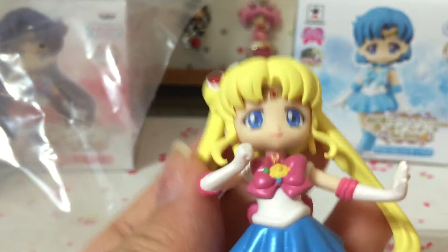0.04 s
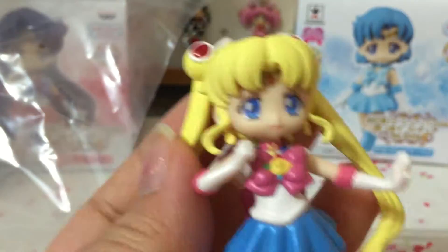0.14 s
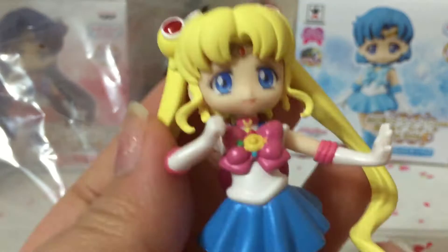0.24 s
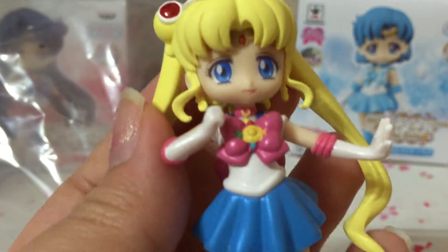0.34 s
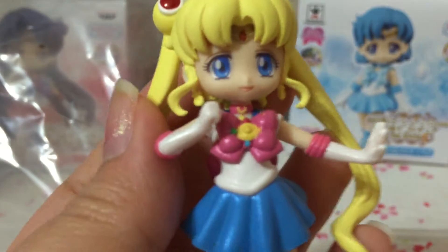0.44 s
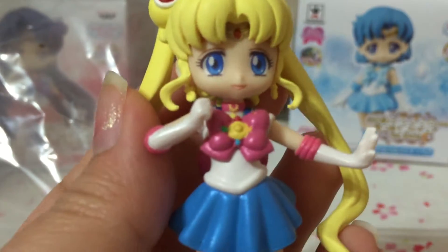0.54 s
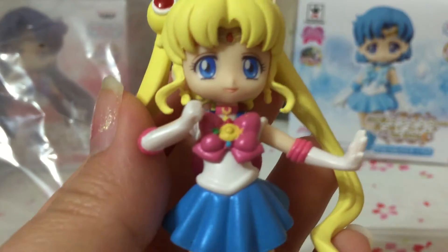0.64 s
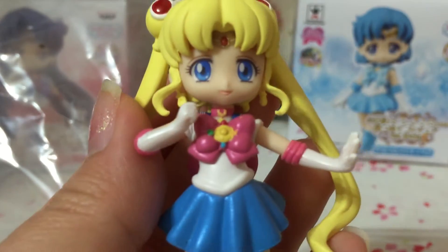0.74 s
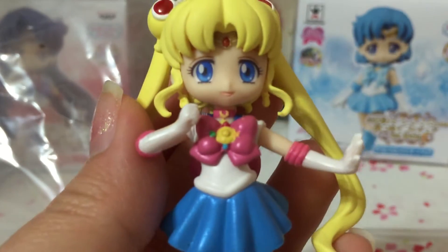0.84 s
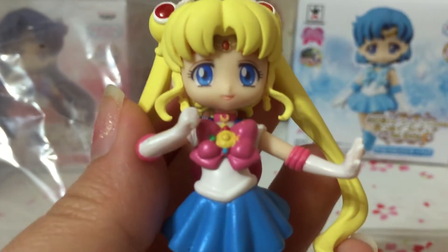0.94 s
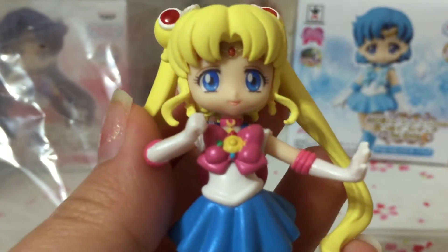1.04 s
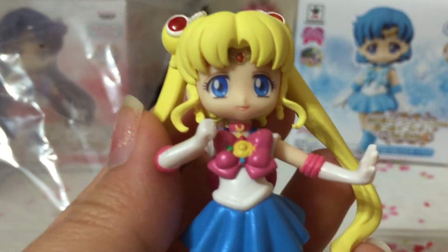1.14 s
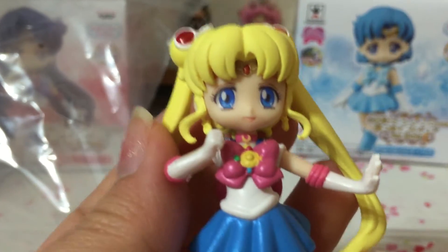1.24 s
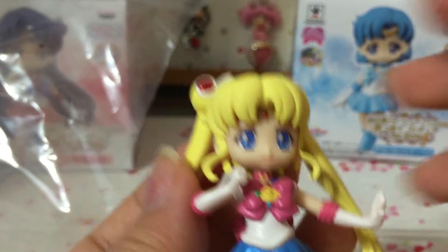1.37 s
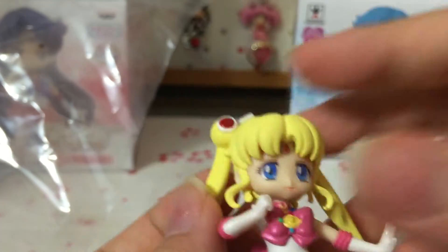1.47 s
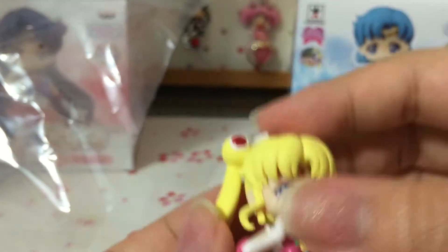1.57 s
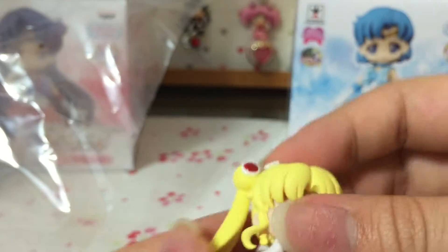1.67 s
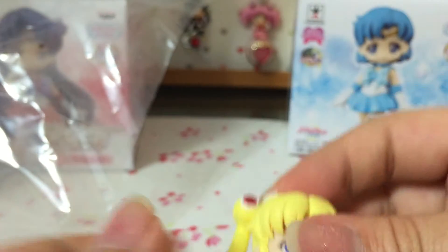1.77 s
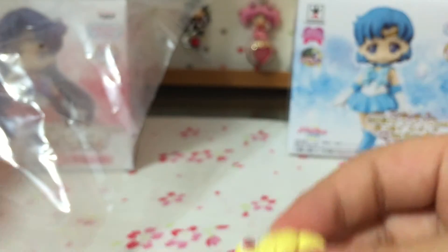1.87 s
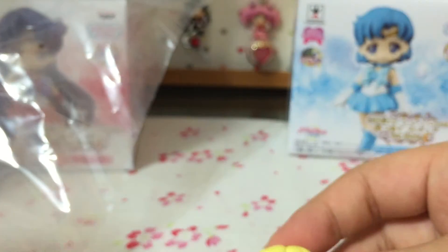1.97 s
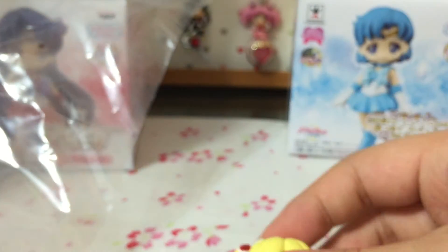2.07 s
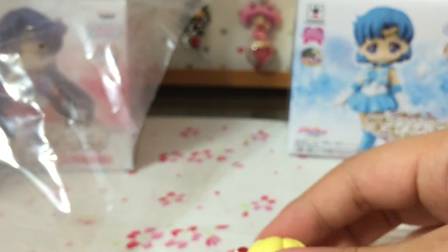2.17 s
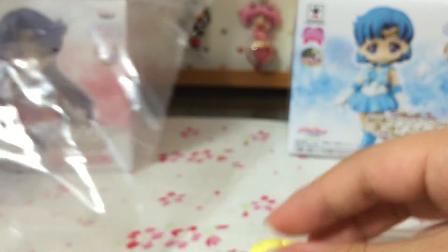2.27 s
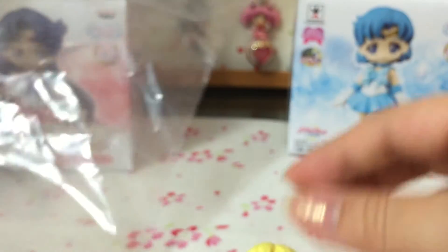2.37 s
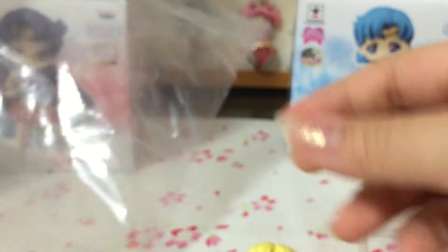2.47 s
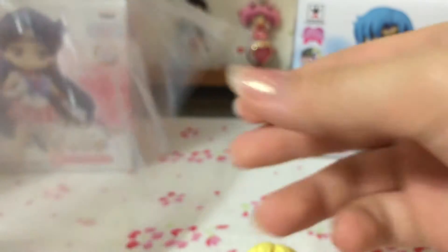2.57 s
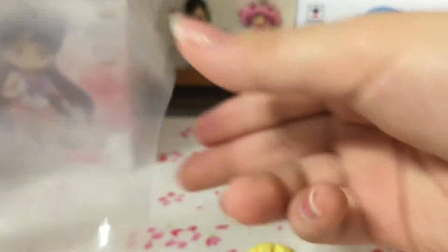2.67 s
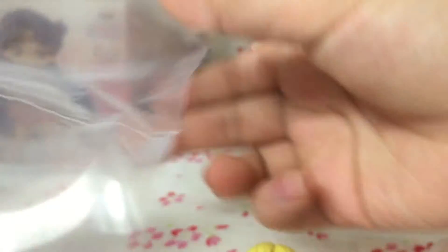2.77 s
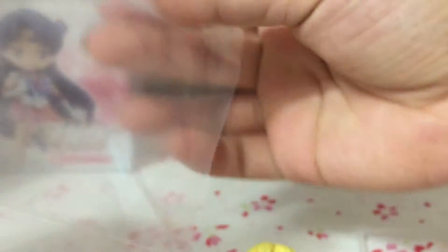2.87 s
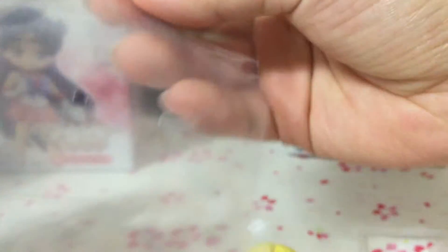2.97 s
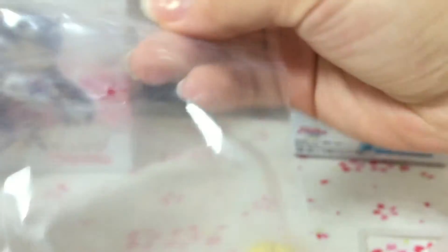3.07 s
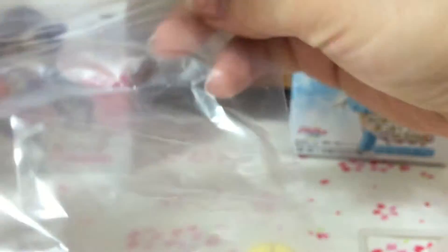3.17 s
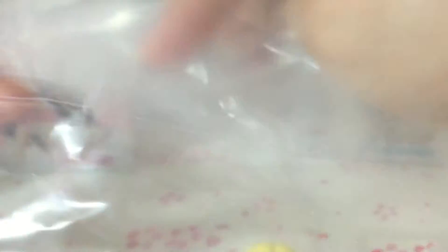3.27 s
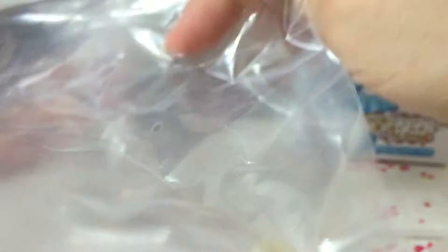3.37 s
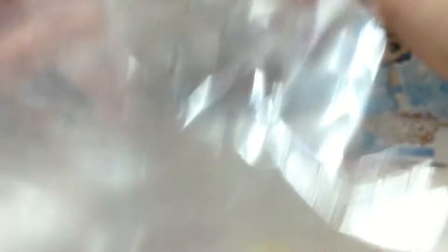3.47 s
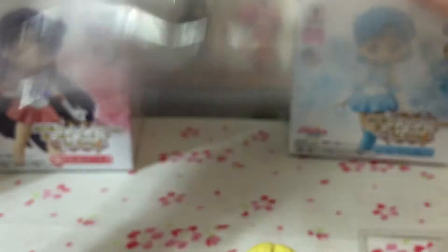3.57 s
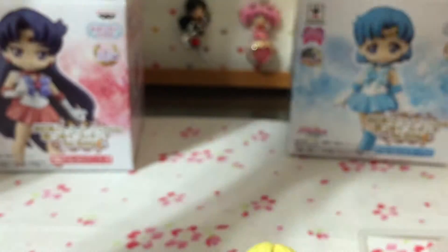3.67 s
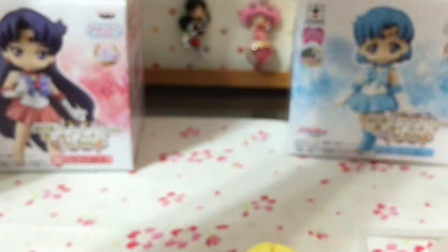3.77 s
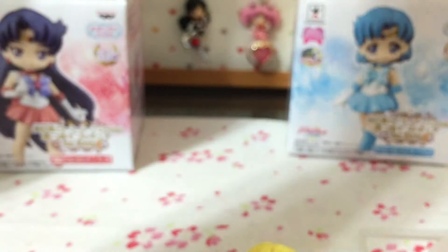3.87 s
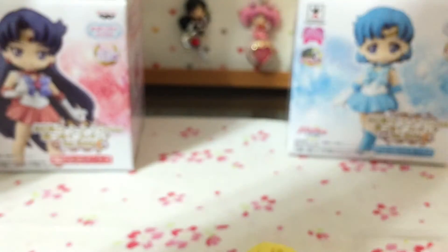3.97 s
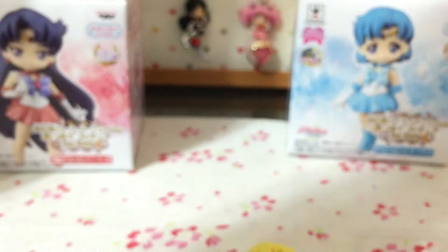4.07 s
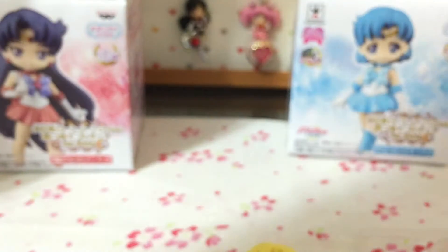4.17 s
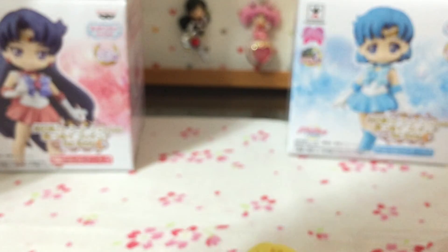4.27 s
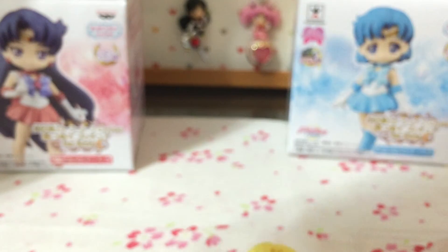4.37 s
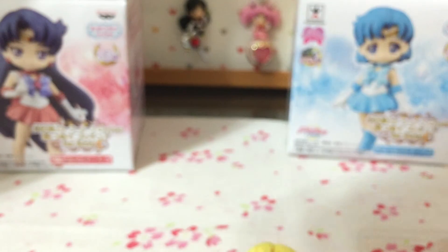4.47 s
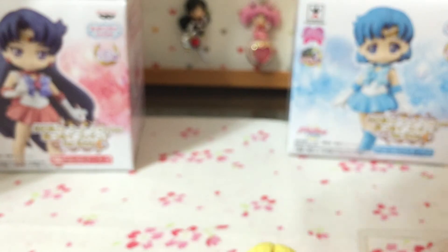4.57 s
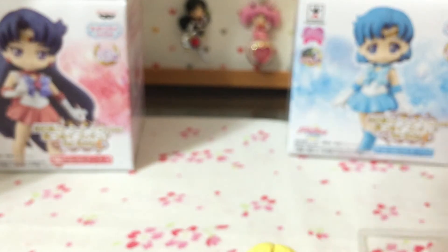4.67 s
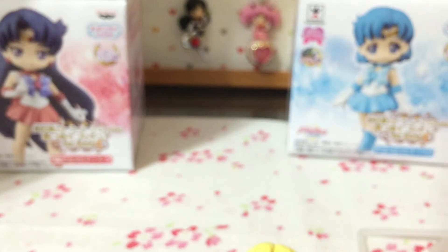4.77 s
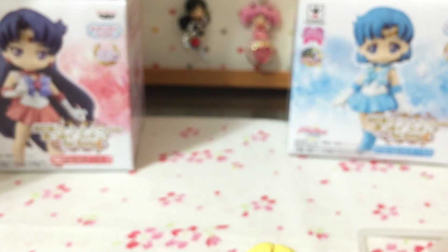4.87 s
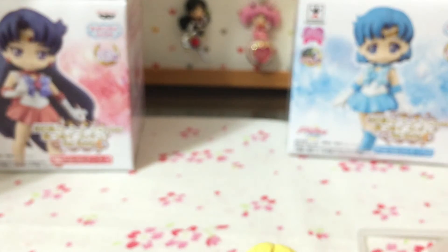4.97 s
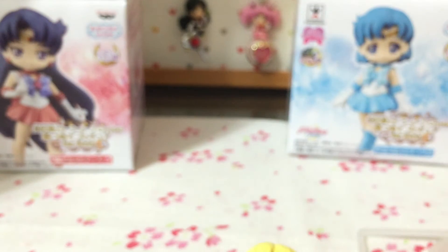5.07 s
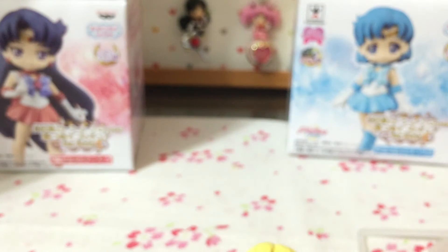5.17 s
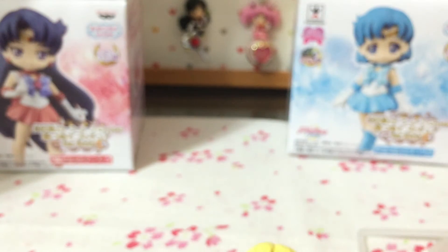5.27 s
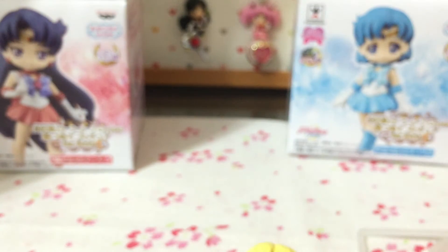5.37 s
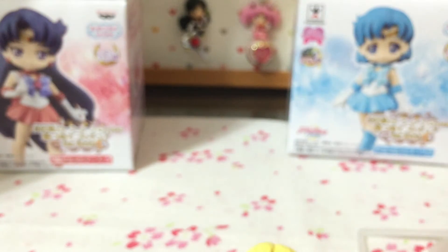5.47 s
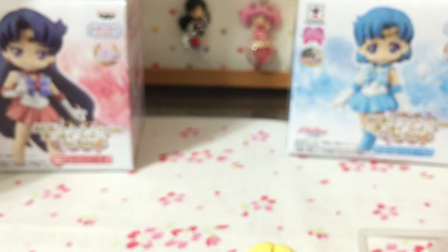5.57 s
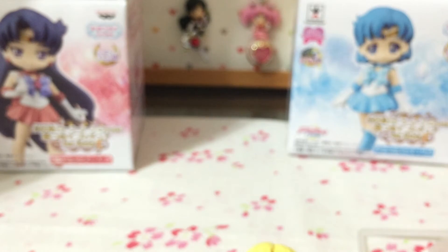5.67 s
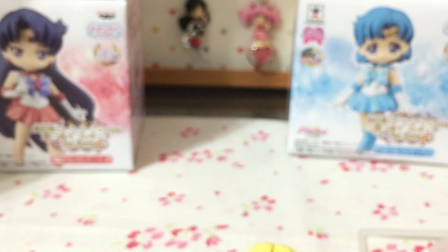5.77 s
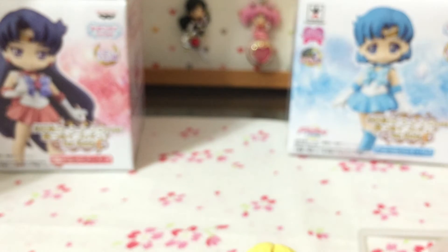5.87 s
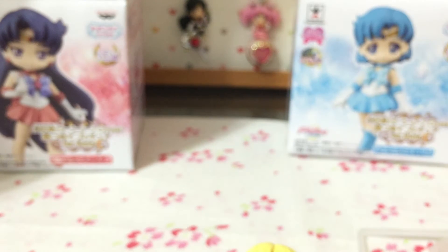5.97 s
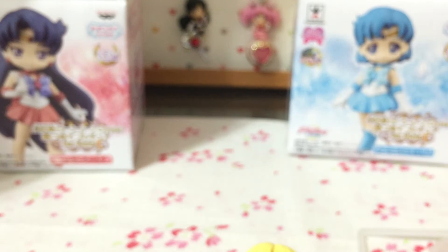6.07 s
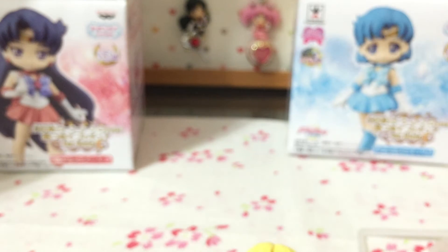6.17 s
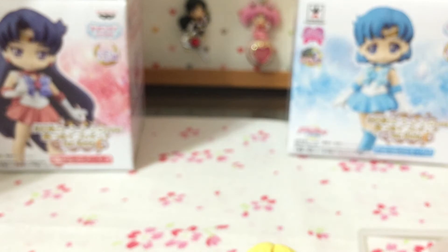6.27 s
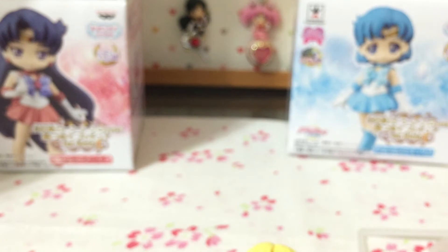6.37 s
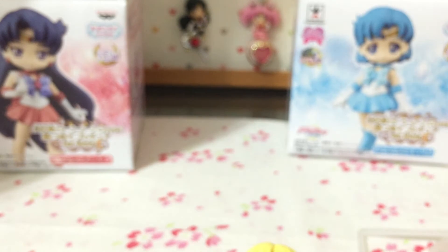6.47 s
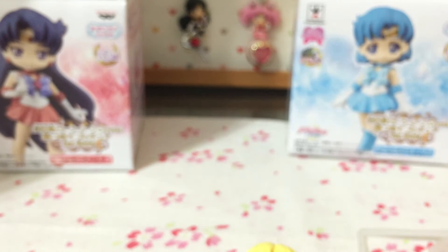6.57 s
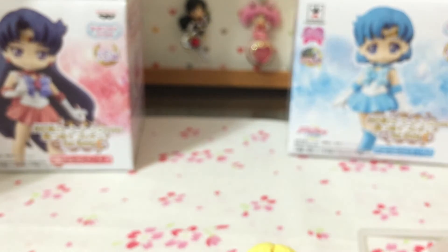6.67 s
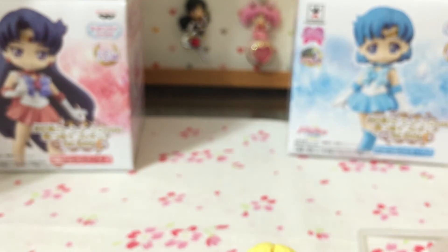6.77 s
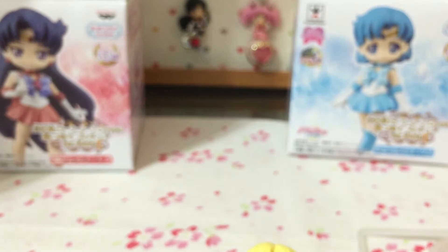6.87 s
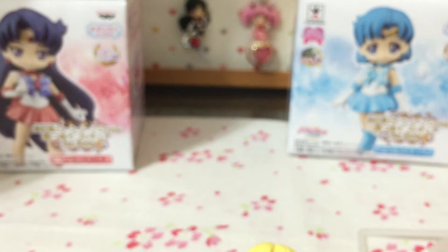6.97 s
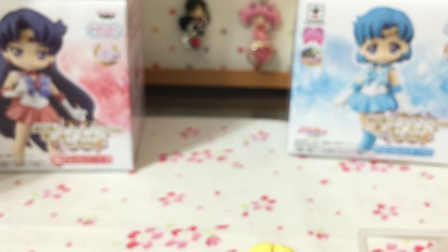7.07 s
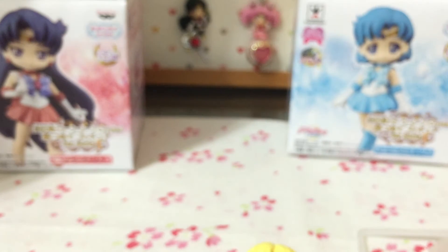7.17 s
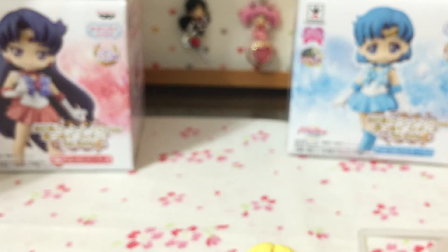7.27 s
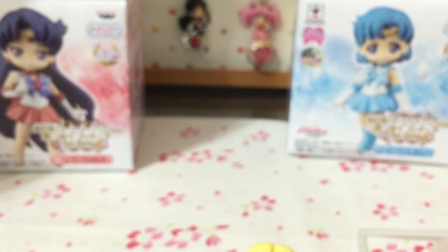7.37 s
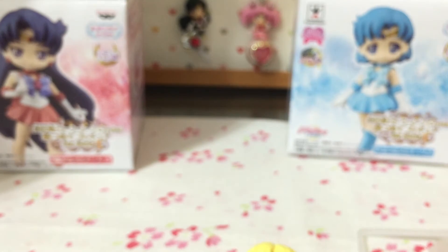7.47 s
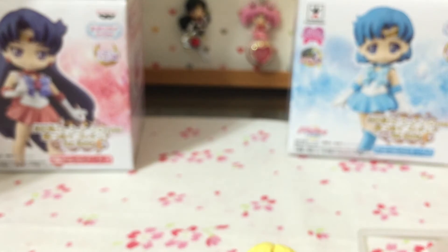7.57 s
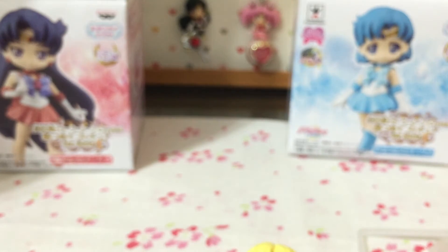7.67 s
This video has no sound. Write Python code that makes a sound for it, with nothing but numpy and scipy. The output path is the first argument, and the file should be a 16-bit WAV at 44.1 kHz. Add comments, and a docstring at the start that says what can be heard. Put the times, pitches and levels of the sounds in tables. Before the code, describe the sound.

Hands pick up a thin plastic bag and crumple it with bright, sharp crackles, knock it softly on a table, then leave a quiet room.

```python
"""At a table in a quiet, small furnished room, hands pick up a thin plastic bag, crumple it and lay it down.
Creases in the film snap over: noise bursts ring the crease and the air pocket beneath, with a broad crackle.
Thousands of tiny creases rustle between them, swelling with each squeeze of the hands.
The bag and a hollow object knock on the table as dying tones. The movement thuds and sways through the
table top as slow and lumpy low noise, over the hiss and rumble of the room's steady air."""
import sys
import numpy as np
from scipy import signal
from scipy.fft import rfft, irfft, next_fast_len
from scipy.io import wavfile
from scipy.ndimage import uniform_filter1d, map_coordinates

SR = 44100
rng = np.random.default_rng(int(sys.argv[2]) if len(sys.argv) > 2 else 0)


def generate_wav(sig):
    """Save sig (samples, or channels by samples) to the path in sys.argv[1] as 16-bit PCM at SR."""
    pcm = np.round(np.clip(np.atleast_2d(sig).T, -1, 1) * 32767).astype(np.int16)
    wavfile.write(sys.argv[1], SR, pcm)


N = 341334  # length in samples

# the shape of the bag as it is folded: (time_s, pocket_hz, crease_hz,
# spread_octaves of crease pitch, scatter_db of sizes: low when the film slides, below 0 counts as 0)
FOLD = [(2.3, 920, 1900, 1.1, -3), (2.56, 1005, 2240, 1.1, 4), (2.9, 930, 2400, 1.1, 1),
        (3.1, 930, 1920, 0.7, 0.5), (3.3, 970, 2270, .7, 2.5), (3.6, 950, 2700, 0.95, 3.5),
        (3.9, 1120, 2780, 0.96, 4), (4.1, 1110, 2210, 0.77, -5), (4.36, 1040, 2100, 0.22, 1.5),
        (4.52, 980, 2330, 0.21, 3), (4.65, 950, 2750, 0.65, 3), (5.0, 784, 2450, 1.05, 2.5),
        (5.14, 1090, 2300, 1, 3), (5.22, 830, 2180, 0.97, 2.3), (5.45, 910, 2310, 0.91, 1.5),
        (5.7, 806, 1650, 0.54, 2.6), (6.1, 760, 2020, 1, 1.5)]


def bag():
    """The plastic film: loud creases one by one, and a dense rustle of small ones."""
    return loud_creases() + rustle()


def loud_creases():
    """Big creases that snap over at set times, each with its own pitch and levels."""
    # one row per snap: (start_s, level_db before a lift, crease_hz, pocket_db and crackle_db
    # relative to level_db before their lifts, life_ms before a stretch)
    snap_table = [(1.7415, -71, 1350, -3, 10, 25), (2.127, -69.5, 5900.0, -2, 5, 3.3),
                  (2.3577, -62, 2370.0, 9, 8, 37), (2.4349, -42, 4480.0, 4, -10, 4.7),
                  (2.4438, -38.5, 4400, -17, -15, 7), (2.4483, -38.5, 4900, -12, -10, 3.4),
                  (2.494, -32.5, 2290, -9, -23, 6.3), (2.5235, -42, 1720.0, -13, -2, 11),
                  (2.5449, -36, 1780, -22, 0, 6.7), (2.5602, -27, 1700, -10, -8, 1.6),
                  (2.5678, -26.5, 2430, -27, -27, 3.4), (2.5743, -29.5, 5560, -11, -1.5, 5.3),
                  (2.5916, -44, 2450.0, -1, -14, 3.9), (2.6212, -46, 2430, -6, -12, 5.8),
                  (2.6245, -46, 2400, -20, 1, 11), (2.6294, -41, 2490, -7, -9, 4.5),
                  (2.656, -51, 1340.0, -8, -7.0, 3.0), (2.6783, -39.5, 1653, 4, -14, 7.6),
                  (2.6883, -32, 3450, -3, 5, 10.5), (2.693, -28, 1990, -5, -33, 2),
                  (2.706, -32, 3260, -10, -16, 7.9), (2.7252, -41, 3300, -10, -16, 6.8),
                  (2.7349, -32.5, 2880, -12, -19, 8.9), (2.739, -52, 3570.0, 7.5, -12, 6.4),
                  (2.7524, -33.5, 4000, -5, 3.5, 10), (2.7653, -29.5, 3820, -9.5, 5, 6.3),
                  (2.7764, -36, 1580, -11, -8, 9.4), (2.7888, -45, 5430.0, -13, 2, 7.0),
                  (2.7945, -43.5, 3400.0, -18.0, -3, 8.0), (2.812, -47, 2150.0, -3, -16, 2.4),
                  (2.8201, -44.5, 3230, -2, -19, 7.7), (2.8437, -44.5, 1370, -3, -6, 8.8),
                  (2.8684, -48, 1540, -12, 4, 5.1), (2.872, -41, 1443, -1, -2.5, 25),
                  (2.938, -48, 3120, -7, 0, 28.6), (2.9636, -43.5, 5700, -22, -9, 9.1),
                  (2.98, -43, 3430, -4, -13, 7.9), (3.0136, -41.5, 2460, -6, 4.5, 2.7),
                  (3.0319, -36, 1360, -7, -4, 18), (3.049, -40, 1560, 0, -11, 23),
                  (3.089, -45, 2840.0, -2, -1, 25), (3.109, -32, 2032, -1, -0.5, 2.4),
                  (3.1273, -28, 2010, -1.5, -14, 12), (3.136, -25.5, 1370, -7, -5, 8.7),
                  (3.1425, -38, 1340.0, -3, 4, 16), (3.1718, -42, 1890.0, 3, -16.0, 3.0),
                  (3.1892, -26.5, 2470, -11, -18, 5.4), (3.1973, -25.5, 1770, -3, -4, 9.9),
                  (3.2067, -42, 2310, -17, -17.0, 5.0), (3.221, -24.5, 2440, -21, 1, 9.1),
                  (3.2266, -26.5, 2880, -7, 3.5, 4.8), (3.234, -30, 6300, 0.5, -6, 5),
                  (3.2453, -39, 2880, -3, -18, 13), (3.257, -49, 3060.0, -10, -11.0, 5.0),
                  (3.2754, -42, 2240.0, 3, -18, 7.8), (3.2845, -35, 2020, -17, -22, 7),
                  (3.2944, -30, 2200, -8, -19, 17), (3.3092, -27, 2200, -4.5, -4, 10),
                  (3.3168, -25, 2160, -17, -19, 5.1), (3.3393, -27, 2420, -25, -21, 1.04),
                  (3.349, -42, 2410.0, -17, -15, 6), (3.3567, -37, 2500.0, -6, -16, 8.6),
                  (3.378, -37, 2760.0, -23, -16, 8.2), (3.383, -29, 2730, -20, -2.5, 12),
                  (3.392, -30, 3080, -25, -17, 1.6), (3.4172, -38, 2900, -5.5, -22, 4.1),
                  (3.4283, -27, 3050, -11, -5, 4.8), (3.458, -40, 3270.0, -14, -11.0, 25),
                  (3.462, -42, 3303, -18, -18, 6.5), (3.4777, -36, 4900, -8, -7, 7.4),
                  (3.4933, -42, 1510.0, -12.0, -18.0, 4.7), (3.5025, -34, 1580, -12, -4, 4.9),
                  (3.51, -32, 2700, -3.5, -20, 4.5), (3.5374, -34.5, 2810, -18, -9, 3.7),
                  (3.5517, -46, 6560, -6, -2, 6.4), (3.563, -43, 1320, 1, -8, 8.5),
                  (3.5682, -37.5, 1750, -1, -6, 31), (3.5742, -31.5, 2680, -22, -16, 6.4),
                  (3.582, -32.5, 2930, -16, 0, 6.9), (3.5896, -37.5, 5400, -2, 2, 3.4),
                  (3.5947, -35.5, 2885, -7, -11, 15), (3.6003, -44, 3360.0, -22, -8.0, 14),
                  (3.626, -36.5, 2970, -17, -6, 8.6), (3.633, -39, 2150, -15, -11, 14),
                  (3.656, -48, 3030, -24, -1, 25), (3.661, -44, 5500, -21.0, -6, 19),
                  (3.717, -48, 2140, -24, -6, 9.7), (3.7274, -36.5, 2650, -15, -1, 11),
                  (3.7373, -48, 5700, -2, 16, 13), (3.7826, -44.5, 2080, -1, -19, 10),
                  (3.837, -44, 2300, -28, -3, 9), (3.865, -37, 2130, -19, -22, 27),
                  (3.8773, -34.5, 2300, -6, 4.5, 15), (3.9, -35.5, 2048, -17, -2, 3),
                  (3.922, -52, 3660.0, -19, 11.5, 19), (3.94, -44, 3300, -14.0, 3, 15),
                  (3.97, -37.5, 1990, -17, -23, 8.9), (3.9766, -42, 2480, -4, -14, 25),
                  (3.9829, -41, 1850.0, -19, 0, 10.0), (4.0097, -27, 3200, -5, 3, 14),
                  (4.0317, -34, 1910, -30, 0, 6.9), (4.037, -29, 4180, -12, -18, 29),
                  (4.0435, -31.5, 1930, -8, 1, 15), (4.058, -36.5, 3170, -6, 6, 17),
                  (4.082, -30, 1720, -10, -19, 14), (4.0946, -34, 3740, -4.5, 7.5, 14),
                  (4.1022, -33, 1860, -28, 1.5, 23.8), (4.1122, -28, 2130, -22, -13, 7),
                  (4.1323, -39, 1920, -23, -2, 8.6), (4.135, -34, 2050, -16, -18, 28),
                  (4.145, -34.5, 1960, -27, -4, 13), (4.1624, -30.0, 2080, -39, -5.5, 9.8),
                  (4.185, -49, 1980.0, -17, -14.0, 4), (4.241, -44, 1880, -2, -9, 12),
                  (4.2448, -39.5, 1990, -19, -17, 16), (4.275, -45.5, 1900, -26, -1, 16),
                  (4.348, -55, 3600, -16, 8, 8.3), (4.38, -53, 2130, -26, -21.0, 13),
                  (4.4318, -38.5, 2220, -36, -14, 4.8), (4.4598, -41, 2240, -7, -2, 7.3),
                  (4.4826, -32, 2290, -27, -25, 30), (4.521, -31.5, 2380, -16.5, -5, 9.7),
                  (4.525, -34, 2400, -22, -3, 9.5), (4.55, -56, 2710.0, -25, 13, 11),
                  (4.571, -49, 2894, -6, -6, 15), (4.5776, -44, 2700, -17, -7.0, 23),
                  (4.5833, -41, 5000, -14, -10, 9.0), (4.5935, -41, 2956, -29, -11, 4.2),
                  (4.6065, -38.5, 4250, -41, -17, 2.7), (4.6257, -46, 2240.0, -15, -19.0, 14),
                  (4.64, -40, 2900, -40.0, -3, 2.2), (4.677, -51.5, 2860, -19, -17, 5.9),
                  (4.9693, -50, 1480, -3, -17.0, 28), (5.0042, -37, 2580, -8, 5, 5.9),
                  (5.047, -46, 4440.0, -22, -6, 9.9), (5.063, -47.5, 2973, -19, -16, 16),
                  (5.1, -57, 1340.0, -15, 2, 10), (5.124, -42.5, 2970.0, -20, -16, 6.4),
                  (5.1423, -44, 2450.0, -8, -11.0, 25), (5.148, -44, 1320, -8, 3, 12),
                  (5.1717, -53, 1680.0, -6, -15.0, 25), (5.231, -47, 3200, -9, 6, 15),
                  (5.2459, -47.5, 3820, 1, 15, 9.7), (5.252, -48, 4300, -14, -6, 13),
                  (5.256, -44, 1480, -2, -6, 8.9), (5.2833, -58, 2415, -2, -8, 9.1),
                  (5.3033, -48, 1340.0, -14, -19, 14), (5.3508, -52, 3840, -1, -11, 16),
                  (5.3699, -55, 3640, -21, -9, 25), (5.4174, -35.5, 2655, -17, -1, 15),
                  (5.432, -43.5, 3940, -17, -13, 11), (5.6067, -40, 1830, 2.5, -4.5, 32),
                  (5.6157, -42.5, 1810, -9, -14, 3.3), (5.882, -45, 2300, -3, -25, 31),
                  (5.9008, -46, 4350, -1, 1, 9.4), (5.904, -45.5, 4300, -4, 7, 23),
                  (5.9396, -46.5, 2060, 4, 2, 2.9), (5.971, -47.5, 3370, -15, 6.5, 16),
                  (6.3408, -63, 4130, -6, -7, 20)]
    start_s, level_db, crease_hz, pocket_db, crackle_db, life_ms = np.transpose(snap_table)
    fold_s, fold_pocket_hz, *_ = np.transpose(FOLD)
    life_s = np.clip(1.37 * life_ms / 1000, 0.001, 0.03)
    return snaps(start_s, level_db + 17.5, crease_hz,
                 level_db + pocket_db + 18.5, level_db + crackle_db + 14,
                 life_s, np.interp(start_s, fold_s, fold_pocket_hz), 0.54, size=1536)


def rustle():
    """Thousands of tiny random creases that come in clumps and follow the squeezes."""
    fall_db_per_s = 514
    damping_base, damping_per_octave = 0.19, 0.48  # creases of like pitch ring more cleanly
    fold_s, pocket_hz, crease_hz, spread_octaves, scatter_db = np.transpose(FOLD)
    draw = rng.random((6000, 4))
    start_s = fold_s[0] + draw[:, 0] * (fold_s[-1] - fold_s[0])

    def now(column):
        return np.interp(start_s, fold_s, column)

    def level(column):
        return squeezing(start_s, fall_db_per_s, column)

    def spread(k, octaves):
        return 2 ** (octaves * (draw[:, k] - 0.5))

    clumps = 0.6 * np.tanh(wobble(90)[(start_s * SR).astype(int)])
    luck = -np.log(draw[:, 1] + 0.015) - 1 + clumps  # few large, many small
    size_db = np.clip(now(scatter_db), 0, 4.5) * luck
    octaves = now(spread_octaves)
    damping = np.clip(damping_base + damping_per_octave * octaves, 0.08, 1)
    # one draw sets both life and pocket pitch: longer snaps have higher pockets
    return snaps(start_s, level(0) + size_db + 10, now(crease_hz) * spread(2, octaves),
                 level(1) + size_db + 11.5, level(2) + size_db + 7,
                 0.0052 * spread(3, 2.46), now(pocket_hz) * spread(3, 0.6), damping, size=768)


def snaps(start_s, crease_db, crease_hz, pocket_db, crackle_db, life_s, pocket_hz, damping, size):
    """Short noise bursts ring the crease, the air pocket under the film and a broad crackle."""
    # tone colour of the crackle: (pitch_hz, relative level_db)
    crackle_colour = [(2000, -71), (3800, -12), (5500, 5), (6800, 2.5), (8000, -3), (9300, 1), (10500, -8),
                      (12500, -2.5), (15000, -11.5)]
    t, f = np.arange(size) / SR, np.fft.rfftfreq(size, 1 / SR)

    def burst_shape(life):
        life = life[:, None]  # time to fall 60 dB
        return amp(-60 * t / life) * (1 - np.exp(-t / (0.04 * life)))

    buckle = rng.standard_normal((len(start_s), size))
    overtone_hz = crease_hz * rng.uniform(2.29, 2.4, len(start_s))  # a second ring of its own
    crease = steep(f, crease_hz, damping) - 0.34 * steep(f, overtone_hz, 0.5)
    push = rfft(buckle * burst_shape(life_s))
    crackle = rfft(buckle * burst_shape(0.76 * life_s))  # the crackle dies sooner
    spectrum = amp(crease_db)[:, None] * unit(push * crease)
    spectrum += amp(pocket_db)[:, None] * unit(push * steep(f, pocket_hz, 0.56))
    spectrum += amp(crackle_db)[:, None] * unit(crackle * amp(along(crackle_colour, f)))
    # add every snap into the sound at its own start
    at = np.round(start_s * SR).astype(int)[:, None] + np.arange(size)
    return np.bincount(at.ravel(), irfft(spectrum, size).ravel(), N)[:N]


def steep(f, hz, damping):
    """A resonance applied twice for each row, all of equal energy."""
    x = 1j * f / hz[:, None]
    return unit((x / (1 + x * x + np.reshape(damping, (-1, 1)) * x)) ** 2)


def squeezing(t, fall_db_per_s, column):
    """Level in dB of one layer at times t: each squeeze swells, holds and dies, and their powers add."""
    # one row per squeeze of the hands: (start_s, hold_s, rustle_db,
    # then relative to rustle_db: pocket_db, crackle_db, thud_db); the layers add their own lifts
    # column 0 is the rustle, 1 the air pocket, 2 the crackle, 3 the thud
    squeezes = [(2.339, 0.034, -60, 0, 7.5, -0.5), (2.416, 0.035, -66.5, 1, -4, 24),
                (2.487, 0.043, -59.5, -3, 4, 2), (2.549, 0.037, -44, -5.5, -2, -4.5),
                (2.616, 0.045, -54.5, -6, 5, -4), (2.681, 0.012, -53, 7, 8, 3.5),
                (2.736, 0.075, -62, 2, 0, 5.5), (2.808, 0.062, -58.5, -2.5, 4, -7),
                (2.888, 0.028, -65.5, 1, 10, 4), (2.942, 0.025, -52, -5, -2, -5),
                (3.002, 0.056, -50.5, 0, 2.5, 3), (3.086, .03, -50.5, 0, 6, 7),
                (3.125, 0.033, -44, -2, -6, 2), (3.19, 0.015, -55, 3, 5, 10.5),
                (3.228, 0.015, -37.5, -4.5, -13, 1), (3.279, 0.068, -41.5, -6.5, -6, -0.5),
                (3.369, 0.056, -52.5, -1.5, 3, -0.5), (3.455, .015, -54, -3, -6, 4),
                (3.486, 0.032, -47.5, -2.5, -8, 4), (3.552, 0.048, -45.5, -8.5, -3, -6),
                (3.616, 0.038, -55.5, -12, 5, -11), (3.723, 0.018, -47, -4, -1.5, -4.5),
                (3.786, 0.058, -62, -3.5, -7, 10), (3.87, 0.014, -35.5, -6.5, -5, -3.5),
                (3.912, .04, -55.5, -6, 0, -13), (3.968, 0.032, -50.5, -6, -14, 6.5),
                (4.011, 0.027, -37, -9, -2, -6), (4.075, 0.075, -45, -8, 2.5, -6),
                (4.194, 0.02, -48, -16, 0, -13.5), (4.236, 0.038, -55.5, -21, 0.5, -10),
                (4.37, .045, -63, -21, -5, -12), (4.429, .038, -47.5, -21, 1, -11),
                (4.476, .02, -43, -17, -8, -12), (4.506, 0.022, -40.5, -19, -12, -15),
                (4.541, .08, -56.5, -28, -2, -12), (4.635, 0.046, -69, -20, 2, -4),
                (4.979, 0.027, -47, -1, -25, 0), (5.051, 0.05, -57, 2.5, -24, -6),
                (5.122, 0.024, -52, 3, -10, -7), (5.172, 0.033, -58.5, 2.5, -10, -1.5),
                (5.23, 0.043, -48, 1, -6, -6.5), (5.29, 0.034, -56.5, -3, -7, -18),
                (5.358, 0.1, -48, -4.5, -4.5, -10), (5.473, .1, -56.5, 1.5, -7, -7),
                (5.589, 0.022, -43, -1.5, -8, -13), (5.644, .06, -59.5, -2.5, -7.5, -11),
                (5.803, .05, -61, -3, -6, -1), (5.865, 0.048, -48, -5.5, -16, -4),
                (5.931, 0.027, -53.5, -18, -25, 3), (5.96, 0.017, -56, -12, -14, -7),
                (6.005, 0.017, -69, -6, -11, 6)]
    rise_db_per_s = 900
    start_s, hold_s, rustle_db, *relative_db = np.transpose(squeezes)[:, :, None]
    early_s = np.maximum(start_s - t, 0)
    late_s = np.maximum(t - start_s - hold_s, 0)
    level_db = rustle_db + [0, *relative_db][column]
    shape_db = level_db - rise_db_per_s * early_s - fall_db_per_s * late_s
    return 10 * np.log10(np.sum(amp(shape_db) ** 2, axis=0) + 1e-20)


def knocks():
    """The bag strikes the table once, then softer knocks ring the table top, hollow object and shell."""
    # the one hard thump: (start_s, level_db)
    thump_s, thump_db = (2.4195, -18)
    # tones of the thump: (pitch_hz, level_db relative to the thump, t60_s to fall 60 dB)
    thump_modes = [(125.6, -10, 0.11), (222.5, 0, 0.026), (339, -2.5, 0.029), (450, -4.5, 0.03),
                   (606, 0, 0.015), (765, -13, 0.015), (950, -4.5, 0.023), (1245, -8, 0.023),
                   (1534, -2, 0.021), (1940, -6.5, 0.01)]
    # softer knocks: (start_s, table_db, hollow_db, shell_db)
    knock_table = [(5.56, -53, -37.5, -50), (5.593, -37.5, -31, -39), (5.848, -38, -31.5, -48),
                   (5.938, -34.5, -33, -32), (6.014, -38, -33.5, -43.5), (7.2, -52.5, -50, -57)]
    # a pair of tones each for table, hollow and shell: (pitch_hz, second_hz, t60_s to fall 60 dB)
    knock_modes = [(155, 337, 0.065), (747, 890, 0.046), (1310, 1950, 0.044)]
    out = np.zeros(N + SR)

    def add(start_s, sound):
        out[round(start_s * SR):][:SR // 5] += sound

    for hz, db, t60 in thump_modes:
        add(thump_s, ring(hz, thump_db + db, t60, 0.00076))
    for start_s, *levels_db in knock_table:
        # the contact clicks, duller towards the top
        for hz in rng.uniform(645, 4730, size=8):
            click_db = levels_db[2] - 5 - 4 * np.log2(hz / 500)
            add(start_s, ring(hz, click_db, 0.034, 0.00064))
        for db, (hz, second_hz, t60) in zip(levels_db, knock_modes):
            add(start_s, ring(hz, db, t60, 0.004))
            add(start_s, ring(second_hz, db - 8.5, t60, 0.0013))
    return out[:N]


def ring(hz, db, t60, rise):
    """One dying tone, 0.2 s long, whose phase wanders a little; t60 and rise in seconds."""
    t = np.arange(SR // 5) / SR
    drift = np.cumsum(uniform_filter1d(rng.normal(0, 0.068, len(t)), size=200))
    swell = 1 - np.exp(-(t / rise) ** 2)
    return amp(db - 60 * t / t60) * np.sin(2 * np.pi * hz * t + drift) * swell


def table():
    """Movement heard through the table top: a low sway and lumpy thuds."""
    return table_sway() + table_thuds()


def table_sway():
    """The table rocks slowly: very low noise that swells and fades around set times."""
    # each rocking: (middle_s, length_s, level_db)
    rockings = [(0.002, 0.047, -52), (.37, 0.12, -59), (0.984, 0.081, -60), (1.18, .05, -60),
                (1.46, .12, -60), (1.892, .06, -66), (2.133, 0.04, -67), (2.453, 0.11, -49.5),
                (2.893, 0.045, -47.5), (3.04, 0.061, -42), (3.145, .06, -46), (3.246, .1, -48),
                (3.47, 0.19, -45.5), (3.757, 0.1, -52), (3.88, .07, -49), (4.147, 0.065, -50.5),
                (4.365, 0.11, -61), (4.66, 0.043, -57.5), (4.78, .09, -58), (4.998, 0.38, -53),
                (5.252, .07, -59.5), (5.455, 0.14, -64), (5.912, 0.17, -59), (7.2, 0.19, -63)]
    # tone colour: (pitch_hz, relative level_db)
    sway_colour = [(20, -16), (35, 6.5), (55, 13), (90, 7.5), (140, -45)]
    rest_db = -66.5  # the middle of a wandering floor
    t, coarse_s = np.arange(N) / SR, np.arange(0, N, 64) / SR
    rocking = sum(amp(db) * np.exp(-((coarse_s - middle_s) / (length_s / 2)) ** 2)
                  for middle_s, length_s, db in rockings)
    floor = amp(rest_db + 2.4 * wobble(10))
    return (np.interp(t, coarse_s, rocking) + floor) * noise(sway_colour)


def table_thuds():
    """Low noise that follows the squeezes, its level wobbling quickly."""
    # tone colour: (pitch_hz, relative level_db)
    thud_colour = [(70, -5.5), (120, 0), (250, -4.5), (450, -9.5), (800, -30)]
    lag_s = 0.0072  # the table answers a little after the film
    fall_db_per_s = 373
    t, coarse_s = np.arange(N) / SR, np.arange(0, N, 64) / SR
    squeeze_db = squeezing(coarse_s - lag_s, fall_db_per_s, column=3)
    thud = np.hypot(amp(np.interp(t, coarse_s, squeeze_db)), amp(-70.5))  # never quite silent
    lumps = amp(-2.5 + 2.2 * wobble(40))
    return thud * lumps * noise(thud_colour)


def walls(x):
    """Echo of a small furnished room: noise in which each frequency dies at its own speed."""
    # how long the echo lasts: (pitch_hz, t60_s to fall 60 dB)
    echo_life = [(300, 0.18), (2000, 0.096), (10000, 0.036)]
    hz, t, z = signal.stft(rng.standard_normal(SR // 3), SR, nperseg=256)
    fading = z * amp(-60 * t / along(echo_life, hz)[:, None])
    tail = signal.istft(fading, SR, nperseg=256)[1]
    delayed = np.pad(x, (90, 0))  # in samples, about 2 ms
    return signal.fftconvolve(delayed, tail / np.linalg.norm(tail))[:N]


def room_air():
    """The steady hiss and rumble of the room: coloured noise whose level wanders slightly."""
    # tone colour: (pitch_hz, relative level_db)
    room_colour = [(71, -33), (120, 0.5), (196, -3.5), (327, -12.5), (410, -20.5), (445, -17.5),
                   (656, -16.5), (1070, -18), (1400, -14.5), (2200, -16.5), (3980, -24.5), (13900, -38),
                   (16000, -67)]
    return amp(-68 + 0.96 * wobble(3.9)) * noise(room_colour)


def noise(colour):
    """Coloured noise of rms 1."""
    return unit(filtered(rng.standard_normal(N), lambda hz: amp(along(colour, hz))))


def wobble(rate):
    """A smooth random curve through rate random points a second."""
    points = rng.standard_normal(int(N * rate / SR) + 4)
    return map_coordinates(points, [np.arange(N) * rate / SR])


def filtered(x, response):
    """Shape the spectrum of x by a response that depends on frequency."""
    m = next_fast_len(N + 8192)  # spare room keeps the end from wrapping onto the start
    return irfft(rfft(x, m) * response(np.fft.rfftfreq(m, 1 / SR)), m)[..., :N]


def along(points, hz):
    """Read a curve of (pitch_hz, value) points on a log frequency axis."""
    f, v = np.transpose(points)
    return np.interp(np.log(hz + 1), np.log(f + 1), v)


def amp(db):
    """Decibels to gain."""
    return 10 ** (np.asarray(db) / 20)


def unit(x):
    """Scale each row to rms 1."""
    return x / np.sqrt(np.mean(np.abs(x) ** 2, axis=-1, keepdims=True) + 1e-20)


def scene():
    """Bag and knocks with their echo, the table's movement and the room's steady air."""
    near = bag() + knocks()
    echo = amp(-13) * walls(near)
    return (near + echo + table() + room_air())[None]


def record(dry):
    """The microphone loses the deepest bass and keeps almost nothing above its band limit."""
    bass_hz, top_hz = 30, 15600
    dry = filtered(dry, lambda hz: (1j * hz / (bass_hz + 1j * hz)) ** 4)
    return filtered(dry, lambda hz: 1 / (1 + (hz / top_hz) ** 90))


dry = scene()
out = record(dry)
generate_wav(out)
```